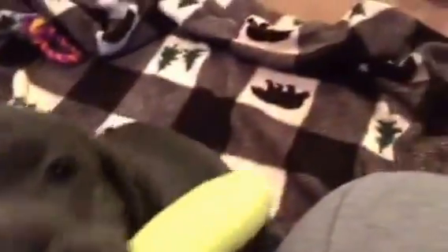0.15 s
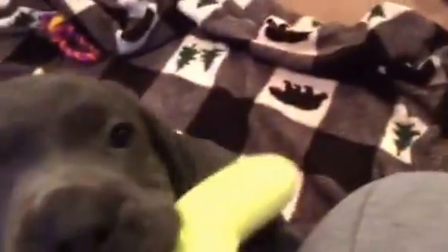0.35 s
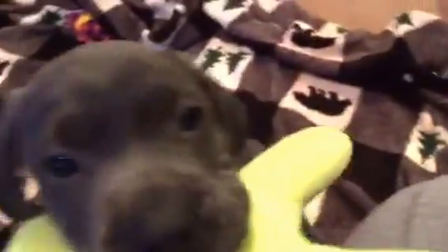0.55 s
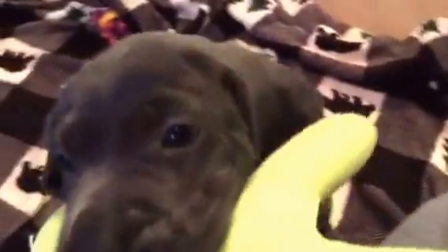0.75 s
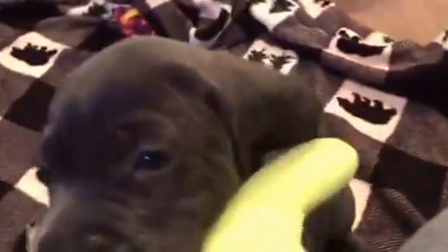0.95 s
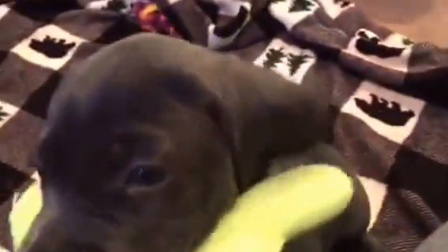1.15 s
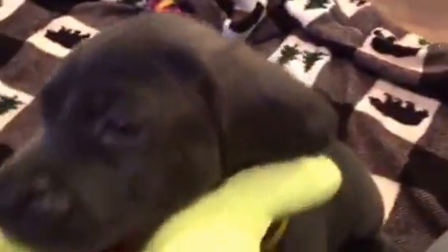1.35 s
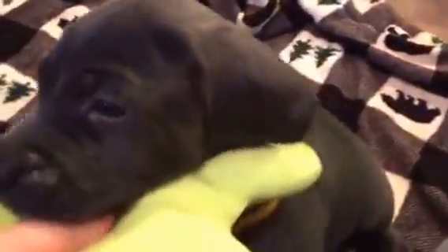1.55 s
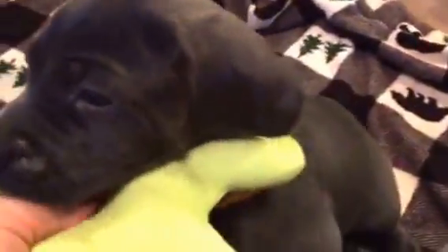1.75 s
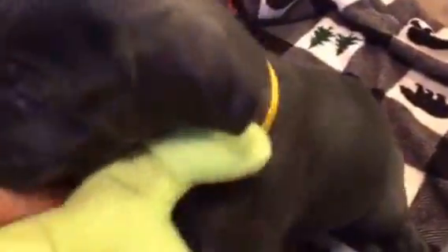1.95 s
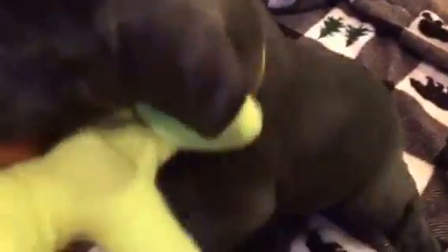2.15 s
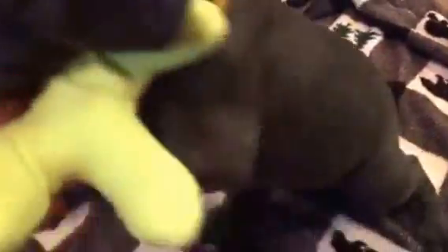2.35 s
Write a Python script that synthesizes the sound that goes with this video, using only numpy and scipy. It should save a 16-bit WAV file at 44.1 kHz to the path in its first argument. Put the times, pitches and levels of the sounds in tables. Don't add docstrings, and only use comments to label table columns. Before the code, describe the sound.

After a brief near-silent hush, a toy squeaker chirps low-high, low-high about every 0.3 seconds, first pumps loudest, with tiny pops and air puffs between, recorded close by a phone in a small quiet room.

```python
import sys
import numpy as np
from scipy import signal
from scipy.fft import rfft, irfft, next_fast_len
from scipy.io import wavfile
from scipy.ndimage import uniform_filter1d, map_coordinates

SR = 44100
rng = np.random.default_rng(int(sys.argv[2]) if len(sys.argv) > 2 else 0)


def attenuation_scalar(level_db):
    decades = np.asarray(level_db, float) / 20
    return 10 ** decades


def int16_out(signal):
    q = np.round(np.clip(np.atleast_2d(signal).T, -1, 1) * 32767)
    wavfile.write(sys.argv[1], SR, q.astype(np.int16))


N = 110250


def unit(x):
    return x / np.sqrt(np.mean(x ** 2) + 1e-20)


def along(points, hz):
    f, v = np.transpose(points)
    return np.interp(np.log(hz + 1), np.log(f + 1), v)


def wobble(rate_hz, size):
    knots = rng.standard_normal(int(size * rate_hz / SR) + 4)
    return map_coordinates(knots, [np.arange(size) * rate_hz / SR])


def noise(spectrum):
    m = next_fast_len(N + 8192)
    closed = [(0.93, -120)] + list(spectrum) + [(SR / 2, -120)]
    shape = attenuation_scalar(along(closed, np.fft.rfftfreq(m, 1 / SR)))
    return unit(irfft(rfft(rng.standard_normal(m)) * shape, m)[:N])


def bell(t, centre_s, spread_s):
    return np.exp(-.5 * ((t - centre_s) / spread_s) ** 2)


def bursts(rows, spectrum):
    t = np.arange(N) / SR
    envelope = sum(attenuation_scalar(db) * bell(t, s, spread) for s, spread, db in rows)
    return envelope * noise(spectrum)


# [freq_hz, density_db]
HUSH_TONE = [(25, -28.5), (60, -6), (170, -16.5), (350, -16.5), (550, -27), (1000, -27), (9000, -32.5),
             (16000, -47.5)]
HUSH_DB = -66
HUM_HZ, HUM_DB, HUM_FADE_DB_PER_S = 350, -75, 8
DUCK_S = [.2, .23, 2.38, 2.45]
DUCK_DB = -4


def hush_and_hum():
    t = np.arange(N) / SR
    duck_db = np.interp(t, DUCK_S, [0, DUCK_DB, DUCK_DB, 0])
    hum_db = HUM_DB - HUM_FADE_DB_PER_S * t + duck_db + 3.9 * wobble(25, size=N)
    hum = attenuation_scalar(hum_db) * np.sin(2 * np.pi * HUM_HZ * t + wobble(28, size=N))
    hush = attenuation_scalar(HUSH_DB + duck_db + 0.32 * wobble(17, size=N)) * noise(HUSH_TONE)
    return hush + hum


# [centre_s, spread_s, level_db]
RUSTLES = [(.02, 0.031, -59), (.12, 0.15, -74.5), (.7, 0.065, -67.5), (1.029, 0.013, -48.5),
           (1.065, 0.011, -53.5), (1.102, 0.011, -56.5), (1.17, 0.04, -62.5), (1.29, 0.028, -69),
           (1.401, 0.03, -62.5), (1.595, 0.029, -55.5), (1.68, 0.025, -64), (1.93, 0.035, -68.5)]
# [freq_hz, density_db]
CLOTH_TONE = [(15, -72), (25, -33), (102, 2), (220, -1), (401, -18.5), (700, -73.5), (910, -82.5),
              (1540, -120)]
CLOTH_FLUTTER_DB = 2


def cloth():
    return attenuation_scalar(CLOTH_FLUTTER_DB * wobble(40, size=N)) * bursts(RUSTLES, CLOTH_TONE)


# [start_s, peak_db]
POPS = [
    (.334, -47),
    (.937, -49),
    (1.595, -51),
    (2.173, -51),
]
# [freq_hz, level_db]
POP_TONE = [(800, -18), (2500, 4), (5000, -6), (9000, -19), (11000, -43)]
POP_T60_S = .006


def bulb_pops():
    t = np.arange(N) / SR
    envelope = sum(attenuation_scalar(db - 60 * np.abs(t - s) / POP_T60_S) * (t > s) for s, db in POPS)
    return envelope * noise(POP_TONE)


PUFF_S = [.012, .27, .397, .552, .68]
PUFF_DB = [-58, -58, -50.5, -56.5, -51.5]
# [freq_hz, level_db]
PUFF_TONE = [(25, -9.5), (60, -4.5), (200, -3), (600, -11.5), (1200, -38.5)]
PUFF_SPREAD_S = .007


def port_puffs():
    rows = [(s, PUFF_SPREAD_S, db) for s, db in zip(PUFF_S, PUFF_DB)]
    return bursts(rows, PUFF_TONE)


# [freq_hz, t60_s]
WALLS = [(1200, 0.46), (3000, 0.48), (8000, 0.59), (14000, 0.13)]
# [freq_hz, level_db]
WALL_TONE = [(1200, 1.5), (4000, -0.5), (9000, -3.5), (14000, 0.5)]
WALL_DB = -28
NEAR_DB, NEAR_T60_S = -24.5, 0.022


def room(x):
    hz, t, z = signal.stft(rng.standard_normal(SR), SR, nperseg=256)
    decay_db = along(WALL_TONE, hz)[:, None] - 60 * t / along(WALLS, hz)[:, None]
    tail = signal.istft(z * attenuation_scalar(decay_db), SR, nperseg=256)[1]
    near_t = np.arange(len(tail)) / SR
    near = rng.standard_normal(len(tail)) * attenuation_scalar(-60 * near_t / NEAR_T60_S)
    walls = attenuation_scalar(WALL_DB) * tail / np.linalg.norm(tail)
    near = attenuation_scalar(NEAR_DB) * near / np.linalg.norm(near)
    return signal.fftconvolve(np.pad(x, (100, 0)), walls + near)


GRIP_HZ = [1300, 2800, 4700, 5900, 7500, 9300, 11500, 14000]
LAG_RAD = .9
SHIMMER_DB = 1.53
END_BRIGHT_DB = 1.5
REFILL_OPENS_DB, OPENS_HZ, OPENS_WIDTH_HZ = 8, 10800, 1100


def reed_overtones(pitch_hz, phase, swell_db, late, tone, grip, polarity):
    k = np.arange(1, 15)[:, None]
    hz = k * pitch_hz
    low, mid, ring, top = grip
    grip_db = along(list(zip(GRIP_HZ, [0, low, mid, mid, ring, ring, top, top])), hz)
    fall = (np.maximum.accumulate(swell_db) - swell_db) / 10
    slap_db = END_BRIGHT_DB * fall * np.clip(np.log2(k), 0, 2)
    opens_db = REFILL_OPENS_DB * (polarity < 0) * late * bell(hz, OPENS_HZ, OPENS_WIDTH_HZ)
    shimmer = np.array([wobble(35, size=len(phase)) for _ in k]) * np.sqrt((k - .5) / 4)
    size_db = along(tone, hz) + grip_db + slap_db + opens_db + SHIMMER_DB * shimmer
    size = attenuation_scalar(size_db) * (hz < 16500)
    waves = size * np.cos(k * phase - LAG_RAD * k * k / 2)
    return np.sum(waves, 0) * np.sqrt(2 / np.sum(size ** 2, 0))


REED_DB = 0.53
ATTACK_S, RELEASE_T60_S = .0015, .009
SAG_HZ_PER_S, JITTER = 8000, .002
AIR_GROWS_DB = 9.5
GASP_DB, GASP_S, GASP_LATE_S = -25, .004, .001
LEAD_S, LEAD_DB = .016, -32


def note(rows, level_db, tone, grip, air_db, air, lead, polarity):
    s, hz = np.transpose(rows)
    first = int(s[0] * SR) - 2500
    t = (first + np.arange(7300)) / SR
    air = air[first:first + len(t)]
    lead = lead[first:first + len(t)]
    after = np.maximum(t - s[-1], 0)
    late = 2 * np.clip((t - s[0]) / (s[-1] - s[0]), 0, 1) - 1

    pitch_hz = np.maximum(np.interp(t, s, hz) - SAG_HZ_PER_S * after, 500)
    pitch_hz = pitch_hz * (1 + JITTER * wobble(400, size=len(t)))
    pitch_hz = uniform_filter1d(pitch_hz, size=150)
    phase = 2 * np.pi * np.cumsum(pitch_hz) / SR
    swell_db = np.interp(t, s, level_db)
    reed = reed_overtones(pitch_hz, phase, swell_db, late, tone, grip, polarity)

    leak = attenuation_scalar(air_db + AIR_GROWS_DB * late) * air * (1 + np.cos(phase))
    start = np.clip((t - s[0]) / ATTACK_S + 1, 0, 1) ** 2
    envelope = attenuation_scalar(swell_db + REED_DB - 60 * after / RELEASE_T60_S) * start
    voiced = envelope * (polarity * reed + leak)
    gasp = attenuation_scalar(np.max(level_db) + GASP_DB) * bell(t, s[-1] + GASP_LATE_S * (polarity > 0), GASP_S)
    rising = attenuation_scalar(level_db[0] + LEAD_DB) * np.exp(np.minimum(t - s[0], 0) / LEAD_S) * (t < s[0])
    return first, voiced + gasp * air + rising * lead


# [time_s, pitch_hz]
SQUEEZES = [
    [(0.221, 1126), (0.228, 1216), (0.238, 1268), (0.249, 1286), (0.259, 1277), (0.265, 1237), (0.273, 984)],
    [(0.509, 1125), (0.516, 1236), (0.525, 1401), (0.534, 1451), (0.544, 1467), (0.548, 1460),
     (0.556, 1011)],
    [(0.812, 1127), (0.82, 1159), (0.831, 1193), (0.843, 1179), (0.854, 1149), (0.861, 1169), (0.869, 1084)],
    [(1.148, 1124), (1.156, 1163), (1.168, 1222), (1.18, 1206), (1.192, 1191), (1.2, 1182), (1.208, 1117)],
    [(1.484, 1141), (1.49, 1146), (1.499, 1167), (1.508, 1177), (1.517, 1166), (1.521, 1163), (1.529, 1131)],
    [(1.764, 1137), (1.771, 1161), (1.78, 1222), (1.791, 1257), (1.801, 1205), (1.806, 1176), (1.814, 1139)],
    [(2.043, 1128), (2.05, 1162), (2.06, 1215), (2.072, 1253), (2.082, 1198), (2.088, 1196), (2.096, 1114)],
]
SQUEEZE_LEVELS = [(-17.4, -15.4, -15.1, -15.6, -16.3, -16.9, -29.9),
                  (-20.6, -17.3, -13.4, -11.7, -11.8, -12.2, -29.2),
                  (-20.0, -19.5, -18.7, -18.9, -20.0, -18.8, -25.6),
                  (-21.0, -19.2, -16.9, -17.9, -18.9, -18.1, -26.4),
                  (-21.3, -19.4, -18.1, -17.9, -18.2, -18.4, -22.5),
                  (-22.2, -18.5, -17.5, -17.6, -19.3, -18.4, -26.9),
                  (-21.1, -19.7, -18.8, -17.5, -20.2, -19.2, -28.2)]
# [db at 2800 Hz, db at 4700-5900, db at 7500-9300, db from 11500]
SQUEEZE_GRIPS = [(1, -8, 1, -3), (-2.5, -3.5, -3.5, 0.5), (-1, 1.5, 1, 3), (-2.5, -1, -0.5, 1),
                 (-2.5, 2.5, -2, 2.5), (-5, -1.5, 1.5, 3), (-4.5, -2, 0.5, 3)]
# [freq_hz, level_db]
SQUEEZE_TONE = [(1150, -2.5), (2500, -1), (3700, -6.5), (5600, -12), (7600, -14), (9200, -5), (10800, -22),
                (15500, -38.5)]
# [time_s, pitch_hz]
REFILLS = [
    [(0.351, 1519), (0.358, 1606), (0.368, 1674), (0.379, 1744), (0.389, 1763), (0.395, 1713),
     (0.403, 1379)],
    [(0.629, 1531), (0.637, 1632), (0.647, 1679), (0.659, 1688), (0.67, 1735), (0.677, 1733), (0.685, 1372)],
    [(0.961, 1519), (0.97, 1571), (0.981, 1599), (0.994, 1610), (1.007, 1570), (1.015, 1487), (1.023, 1383)],
    [(1.282, 1518), (1.291, 1563), (1.302, 1610), (1.315, 1604), (1.328, 1520), (1.336, 1478),
     (1.344, 1409)],
    [(1.624, 1517), (1.632, 1575), (1.642, 1625), (1.653, 1640), (1.664, 1612), (1.67, 1540), (1.678, 1381)],
    [(1.892, 1510), (1.901, 1564), (1.913, 1588), (1.926, 1586), (1.939, 1527), (1.947, 1498),
     (1.955, 1391)],
    [(2.2, 1510), (2.209, 1562), (2.221, 1596), (2.234, 1608), (2.247, 1529), (2.255, 1475), (2.263, 1402)],
]
REFILL_LEVELS = [(-17.4, -13.9, -12.6, -11.8, -12.3, -12.3, -25.9),
                 (-17.5, -14.3, -12.4, -12.3, -12.7, -11.6, -27.4),
                 (-18.1, -15.5, -15.2, -15.5, -17.3, -20.8, -29.0),
                 (-19.9, -16.4, -16.0, -16.2, -19.4, -22.4, -27.2),
                 (-17.5, -15.9, -15.4, -15.1, -17.3, -17.8, -29.2),
                 (-19.2, -16.8, -16.8, -17.1, -19.1, -19.9, -28.8),
                 (-19.2, -17.0, -16.5, -17.4, -19.4, -22.0, -29.1)]
# [db at 2800 Hz, db at 4700-5900, db at 7500-9300, db from 11500]
REFILL_GRIPS = [(0.34, -3.5, 1, -0.5), (3.2, -1.5, 4.5, 5.5), (3.9, 4, 7, 4.5), (-0.0023, 3.5, 1, 1),
                (0.45, 2, 3, 7.5), (-2, -2, 2.5, 3.5), (0.51, 1.5, 0, 1.5)]
# [freq_hz, level_db]
REFILL_TONE = [(1500, 1), (3200, -8), (4800, -17), (6400, -22.5), (7900, -29.5), (8800, -37.5), (9600, -21),
               (15500, -35)]
# [freq_hz, level_db]
AIR_TONE = [(900, -30), (2200, -4), (4000, -3), (7000, -5), (9500, 0), (12000, -6), (15500, -16)]
# [freq_hz, level_db]
LEAD_TONE = [(900, -2), (1600, 10.5), (3000, -5.5), (6000, -12), (9200, -3), (12000, -17), (15500, -32.5)]
SQUEEZE_AIR_DB, REFILL_AIR_DB = -27, -38
LOWEST_HZ = 750


def squeaker():
    out, air, lead = np.zeros(N + 2 * SR), noise(AIR_TONE), noise(LEAD_TONE)
    kinds = [(SQUEEZES, SQUEEZE_LEVELS, SQUEEZE_GRIPS, SQUEEZE_TONE, SQUEEZE_AIR_DB, 1),
             (REFILLS, REFILL_LEVELS, REFILL_GRIPS, REFILL_TONE, REFILL_AIR_DB, -1)]
    for *notes, tone, air_db, polarity in kinds:
        for rows, level_db, grip in zip(*notes):
            first, x = note(rows, level_db, tone, grip, air_db, air, lead, polarity)
            wet = room(x)
            out[first:first + len(x)] += x
            out[first:first + len(wet)] += wet
    highpass = signal.butter(2, LOWEST_HZ, "high", fs=SR, output="sos")
    return signal.sosfiltfilt(highpass, out[:N])


def scene():
    mix = hush_and_hum() + cloth() + bulb_pops() + port_puffs() + squeaker()
    return np.tile(mix, (2, 1))


def band_limit(x):
    return signal.sosfilt(signal.butter(12, 16790, fs=SR, output="sos"), x)


def record(dry):
    return band_limit(dry)


dry = scene()
out = record(dry)
int16_out(out)
```